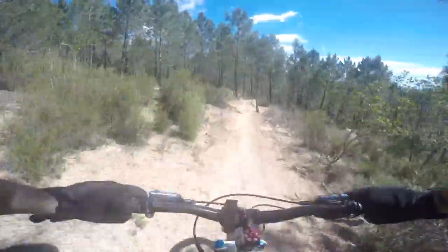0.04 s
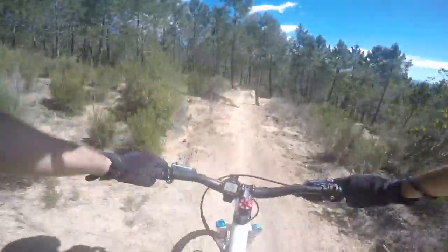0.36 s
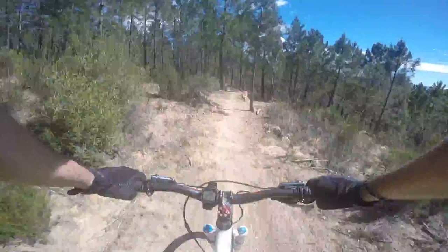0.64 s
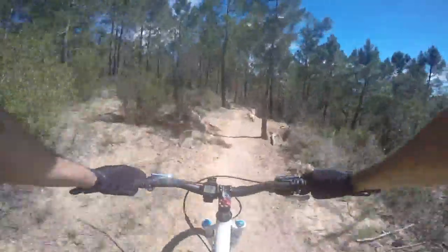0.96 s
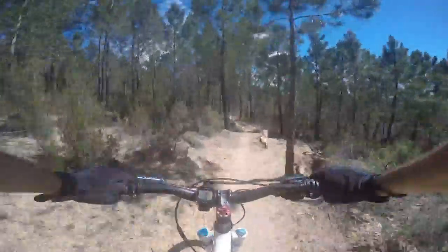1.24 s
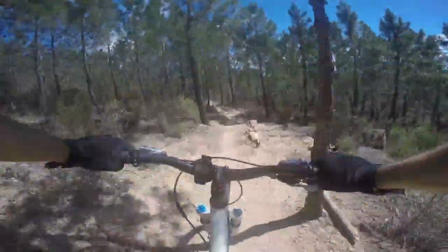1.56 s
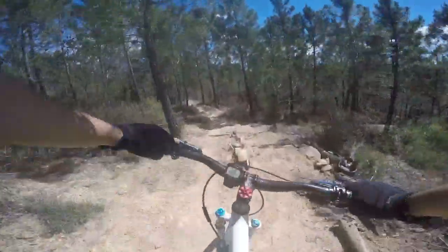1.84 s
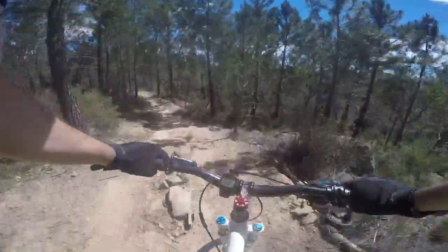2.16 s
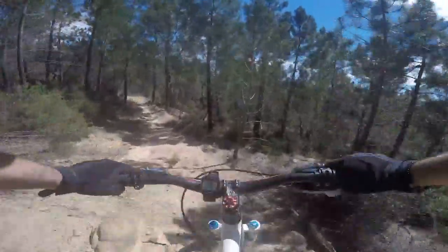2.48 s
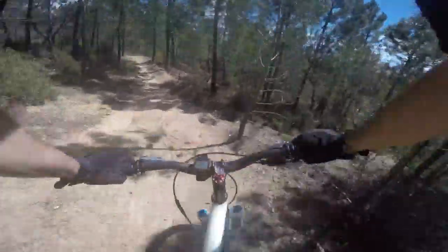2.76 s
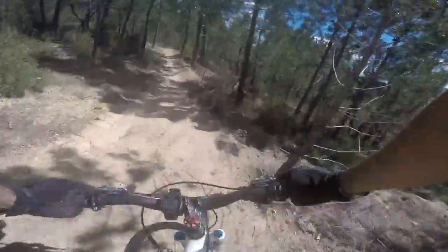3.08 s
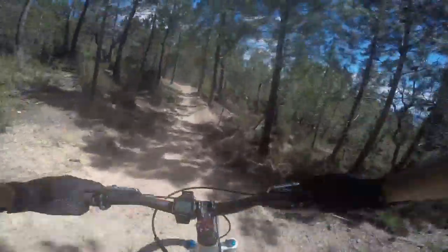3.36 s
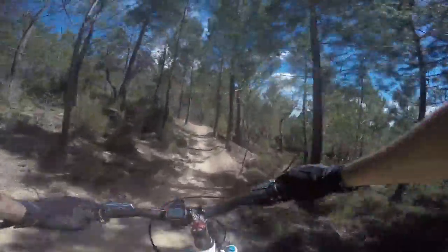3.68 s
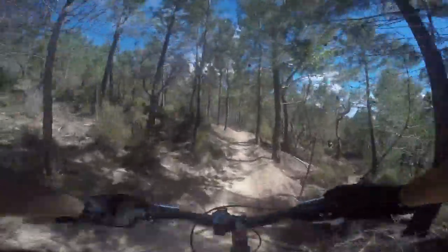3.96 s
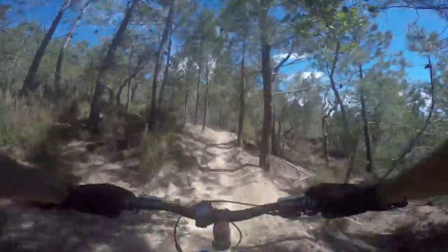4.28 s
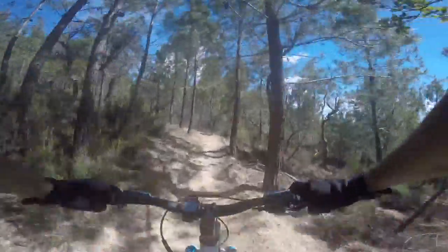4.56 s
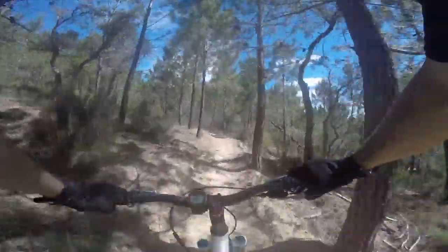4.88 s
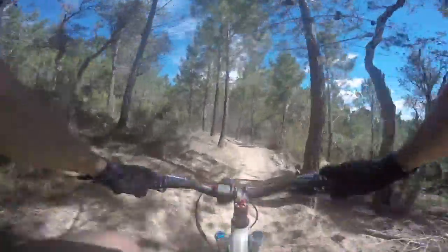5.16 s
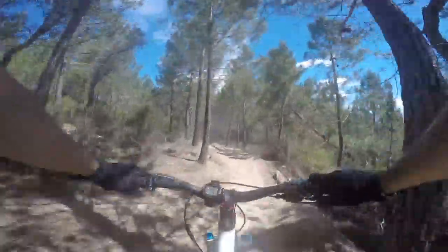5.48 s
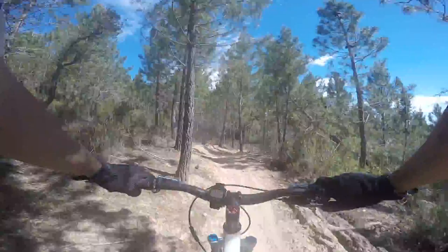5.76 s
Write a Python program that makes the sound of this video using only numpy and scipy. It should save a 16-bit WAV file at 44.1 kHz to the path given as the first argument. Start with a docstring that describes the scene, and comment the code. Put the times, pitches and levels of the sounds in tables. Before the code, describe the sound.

Gusty wind rumbles over the crunch of bicycle tyres on dirt and stones, with a buzzing freewheel, chain slaps and hollow bumps.

```python
"""A mountain bike runs down a dry forest trail, heard from a camera on the rider's chest.
From the start, wind buffets the microphone, the tyres crunch over grit and the freewheel sizzles.
The chain slaps early on, stones clack, and near 2 s one of them makes the wheel ring. Halfway, the tyres
skid through loose stones and bumps thump the hollow frame. Near 4 s the freewheel fades and the wind
picks up again; the chain slaps twice more, and the gears give their loudest clicks shortly before the end.
"""
import sys
import numpy as np
from scipy import signal
from scipy.fft import rfft, irfft
from scipy.io import wavfile
from scipy.ndimage import uniform_filter1d

SR = 44100
rng = np.random.default_rng(int(sys.argv[2]) if len(sys.argv) > 2 else 0)


def unload_wav(signal):
    """Save mono or channel-first audio to the path in sys.argv[1] as 16-bit WAV at rate SR, clipped to [-1, 1]."""
    wavfile.write(
        sys.argv[1],
        SR,
        np.round(np.clip(np.atleast_2d(signal).T, -1, 1) * 32767).astype(np.int16),
    )


N = 265923
T = np.arange(N) / SR

# Levels are relative: the functions add their own gains. A fade time is how long a 60 dB drop takes.
# air flowing over the microphone, weaker in slow, sheltered bends: (time [s], level [dB])
AIRFLOW = [(0, -21.5), (0.1, -12.5), (1.15, -10.5), (1.6, -13.5), (2.2, -13), (2.45, -20.5), (2.9, -22),
           (3.25, -23), (3.55, -30), (3.84, -22.5), (4.06, -14), (4.3, -14.5), (4.66, -27), (4.9, -23.5),
           (5.02, -13.0), (5.4, -16.5), (5.8, -17), (6.03, -27.5)]
# single gusts: (peak time [s], length [s], rumble level [dB], flutter level [dB])
GUSTS = [(0.273, 0.097, -9, -16.5), (0.58, 0.14, -27, -19.5), (1.026, 0.18, -31, -15),
         (1.18, 0.046, -13, -15), (1.312, 0.18, -34, -19.5), (1.49, 0.11, -12.5, -16),
         (1.706, 0.12, -12, -27), (2.073, 0.11, -10.5, -28), (2.222, .13, -26, -20.5),
         (2.6, 0.17, -16, -34), (2.771, 0.073, -13.5, -30), (3.242, .08, -21, -30.5),
         (3.712, 0.045, -18, -30), (4.153, 0.14, -19.5, -23), (4.358, 0.036, -34, -23),
         (4.807, 0.073, -16, -39), (5.004, 0.087, -15.5, -19), (5.268, 0.078, -24, -18.5),
         (5.36, 0.14, -12.5, -20), (5.562, .15, -19, -23)]
# short lulls in the airflow: (time [s], length [s], drop [dB])
LULLS = [(0.388, 0.056, 1), (0.71, .09, 3.5), (.9, 0.075, 9), (1.581, 0.076, 1.5), (2.47, 0.16, 4),
         (3.832, 0.098, 7.5), (5.1, 0.073, 5), (5.492, 0.041, 2)]
# deep rumble of big swirls of air: (frequency [Hz], level [dB])
RUMBLE_TONE = [(8, 1), (18, -6), (28, 2.5), (38, -5.5), (50, 2.5), (70, -6), (100, -8.5), (150, -29),
               (250, -28.5), (500, -93)]
# flutter of small swirls of air: (frequency [Hz], level [dB])
FLUTTER_TONE = [(50, -9), (90, 2), (130, 3), (180, -3), (260, -8), (350, -10.5), (470, -17), (600, -30.5),
                (900, -42), (2000, -75)]

# how hard the tyres work the dirt: (time [s], level [dB])
ROLLING = [(0, -38.5), (0.38, -39.5), (0.5, -36.5), (0.9, -36.5), (1.25, -33), (1.6, -39), (1.8, -32.5),
           (2.05, -41), (2.5, -41), (2.95, -37), (3.3, -42.5), (3.5, -43), (4.2, -45.5), (4.75, -44.5),
           (5.15, -43.5), (5.75, -45), (6.03, -44.5)]
# the tyres go light over a crest: (time [s], length [s], drop in their work [dB])
HOPS = [(0.385, 0.085, 3.5), (3.166, 0.12, 5.5), (4.558, 0.036, 9), (4.97, .12, 2.5)]
# patches of coarser grit: (peak time [s], length [s], level [dB])
GRIT_PATCHES = [(0.503, 0.13, -42), (1.116, .08, -39), (1.222, 0.17, -38), (3.063, 0.27, -41.5),
                (3.653, 0.17, -42)]
# grit being crushed: (frequency [Hz], level [dB])
GRIT_TONE = [(300, 1), (800, 2.5), (1080, 4.5), (1350, -5), (1650, -3.5), (2050, 3), (2350, 3), (2800, -2),
             (3500, -13), (5000, -42), (6000, -44), (12000, -65)]
# fine dirt thrown up: (frequency [Hz], level [dB])
SPRAY_TONE = [(1300, -11), (2200, -16.5), (2750, 0), (3200, 1.5), (3550, -0.5), (4200, 4.5), (4800, 3),
              (5300, -7.5), (5900, -14), (7000, -13), (12000, -72)]
# the frame droning on rough ground: (frequency [Hz], level [dB])
DRONE_TONE = [(100, -22), (190, -1), (235, -12), (262, 12), (295, -1), (400, 0.5), (485, 0), (550, -10.5),
              (850, -18.5), (1070, -15), (1300, -26), (2500, -67)]
# the tyres bite into loose stones and slide: (time [s], level [dB], fade time [s])
SKIDS = [(2.685, -22.5, .3), (2.715, -25, 0.5), (2.803, -31.5, 0.39), (2.868, -27, 0.13),
         (2.927, -30.5, 0.16), (3.205, -37, 1.1)]
# gravel grinding in a skid: (frequency [Hz], level [dB])
GRAVEL_TONE = [(120, -45), (200, 15), (280, 0.5), (480, 8), (750, 4), (1100, -2), (1330, -7.5),
               (1700, -2.5), (2900, -1), (3600, -4.5), (4300, -1), (5000, -3.5), (5700, -16), (9000, -50),
               (15000, -49)]

# bumps that thump the frame: (time [s], level [dB])
THUMPS = [(0.535, -12.5), (2.363, -19.5), (2.725, -15.5), (2.782, -11), (2.805, -14), (2.855, -0.5),
          (2.871, -4), (2.924, -11.5), (2.934, -13.5), (3.094, -20), (3.193, -13), (3.219, -19),
          (3.839, -22), (3.972, -15)]
# notes the frame rings with: (frequency [Hz], level [dB], fade time [s])
FRAME_NOTES = [(402.3, -3.5, 0.08), (479, 6, 0.018), (740, -8.5, 0.026), (850, -14, 0.11),
               (1240, -55, .035)]
# large stones knocked by the tyres: (time [s], level [dB], brightness [Hz], fade time [s])
STONES = [(0.0293, -23.5, 2390, 0.089), (0.6407, -23, 2520, 0.24), (0.8104, -20.5, 1760, 0.096),
          (0.930, -31, 2690, 0.043), (1.1378, -18, 1700, 0.033), (1.267, -22.5, 2500, 0.04),
          (1.409, -22, 3020, 0.025), (1.4502, -10, 4100, 0.016), (1.7773, -25, 4440, 0.12),
          (1.9694, -21.5, 2660, 0.048), (2.629, -21, 2370, 0.15), (2.6523, -24, 2650, 0.13),
          (2.6914, -15.5, 1920, 0.043), (2.7234, -20, 2880, 0.024), (2.805, -21, 1930, 0.045),
          (3.0012, -22.5, 1510, 0.1), (3.06, -24, 1400, 0.051), (3.1042, -18, 1610, 0.033),
          (3.1905, -12.5, 1910, 0.034), (3.1955, -15.5, 3980, 0.03), (3.268, -27, 4160, 0.14),
          (3.319, -24, 2080, 0.01), (3.9649, -24, 1830, 0.07), (4.416, -23.5, 1990, 0.014),
          (5.4137, -23.5, 2000, 0.055)]
# a dry clack: (frequency [Hz], level [dB])
CLACK_TONE = [(150, -15), (500, 12), (800, -4), (1130, 9), (1370, -10.5), (1650, 5), (2100, 8.5), (2400, 2),
              (2850, 8), (3550, 2.5), (4100, 8.5), (5100, -5.5), (6100, -13.5), (9000, -18.5), (15000, -39)]
# notes the wheel rings with: (frequency [Hz], level [dB], fade time [s])
WHEEL_NOTES = [(756, -7.5, 0.37), (1073, -10, .25), (1506, -12, .22), (1620, -3.5, .1), (2240, -2, .08),
               (2720, 7, 0.037)]
# the chain slaps the frame tube beside it: (time [s], level [dB], tilt towards treble [dB per octave])
SLAPS = [(0.4601, -15.5, -0.5), (4.6508, -21.5, -2), (4.8927, -18, -1)]
# notes that tube rings with: (frequency [Hz], level [dB], fade time [s])
TUBE_NOTES = [(407, 0.5, 0.023), (580, 0.5, 0.02), (1185, -4, 0.014), (1360, -12, 0.028),
              (1830, -5.5, 0.028), (2000, -3.5, .028), (2220, -9, 0.017), (3180, -8.5, 0.011),
              (3760, -8, .012), (3850, -7.5, 0.014), (4270, -9, 0.015), (5040, -6, 0.0088),
              (5490, -6, 0.011), (6400, -19, 0.0078)]
# clicks of the shifter and gears: (time [s], level [dB], fade time [s], top treble boost [dB])
GEAR_CLICKS = [(0.947, -25, 0.026, -17), (1.266, -25.5, 0.044, -7), (1.449, -29, 0.013, -20),
               (2.7695, -25, 0.026, -5), (3.019, -29.5, 0.021, 1), (3.201, -28, 0.024, -16),
               (4.015, -27, 0.04, -12), (5.2998, -17, 0.015, -5), (5.4263, -19, 0.015, -1),
               (5.5362, -23.5, 0.019, -1), (5.8356, -42, .014, -6)]
# one gear click: (frequency [Hz], level [dB])
GEAR_TONE = [(1000, -33), (2800, -4), (3700, 4), (4560, 10), (5400, 4), (6350, 0), (7100, -5), (7970, -2.5),
             (9400, -7), (12000, -8.5), (14300, -9), (16000, -7)]

# base loudness of the freewheel and the sand: (time [s], level [dB])
COASTING = [(0.0, -60), (1.29, -58), (2.06, -62), (2.6, -60.5), (3.7, -60.5), (4.03, -69.5), (4.4, -66.5),
            (6.03, -69.5)]
# the freewheel's sizzle: (frequency [Hz], level [dB])
SIZZLE_TONE = [(2000, -10.5), (3500, -5), (4300, 0.5), (5200, 6), (5900, -3), (6900, 0), (8200, -11),
               (10500, -9.5), (11800, -19), (13500, -10), (15300, -19), (16500, -28)]
# pace of the clear clicks of the pawls, the freewheel's little catches: (time [s], rate [clicks per s])
PAWL_RATE = [(0, 42), (.4, 90), (.6, 61), (.95, 66), (1.3, 48), (1.65, 44), (1.95, 39), (2.2, 41),
             (2.35, 40), (2.58, 40), (3.0, 57), (3.35, 76), (3.8, 87)]
# one pawl click: (frequency [Hz], level [dB])
PAWL_TONE = [(2000, -20), (4500, 18.5), (7000, -0.5), (10000, 5), (12000, -11), (14500, -1), (16500, -9)]

# the tyres' side knobs scrape hard dirt: (peak time [s], length [s], level [dB])
SCRAPES = [(0.665, 0.078, -44.5), (1.176, 0.19, -46), (4.197, 0.19, -45), (4.788, 0.038, -50),
           (5.13, 0.077, -43), (5.971, 0.098, -43.5)]
# the rasp of those knobs: (frequency [Hz], level [dB])
RASP_TONE = [(1200, -21), (2200, -5.5), (2900, 1.5), (3500, -1), (4500, -9.5), (6000, -21), (12000, -41)]
# soft, high swishes: (peak time [s], length [s], level [dB])
SWISHES = [(4.478, 0.26, -45.5), (4.602, .06, -46)]
# bright hiss shared by swishes, sand and the chain's snap: (frequency [Hz], level [dB])
HISS_TONE = [(2000, 6), (4500, 9), (7000, -1.5), (10000, -1.5), (12000, -9), (15000, -5), (16000, -15)]
# notes the camera's case rings with: (frequency [Hz], width [Hz], level [dB])
CASE_NOTES = [(1065, 64, -13), (1454, 420, -2), (2080, 50, -26), (2464, 55, -1.5), (2632, 73, -2),
              (3110, 130, -6.5), (3990, 95, -23)]

CRUNCH_GROWTH, SPRAY_GROWTH, DRONE_GROWTH = 0.59, 1.22, 0.37  # dB gained per dB of tyre work
FULL_FLOW_DB, FLUTTER_GROWTH = -13, 1.73  # a strong airflow; dB of flutter gained per dB of airflow


def wind():
    """Big swirls of air push on the microphone; small ones break off in puffs, more so in faster air."""
    flow_db = curve(AIRFLOW) - sum(drop_db * swell(s, length) for s, length, drop_db in LULLS)
    push = amp(flow_db - 1.5 + 1.57 * wander(hz=8.4))
    puffs = amp(-23.5 + FLUTTER_GROWTH * (flow_db - FULL_FLOW_DB) + 0.5 * wander(hz=6.5))
    for s, length, rumble_db, flutter_db in GUSTS:
        push = np.hypot(push, amp(rumble_db) * swell(s, length))  # hypot adds two sounds' powers
        puffs = np.hypot(puffs, amp(flutter_db) * swell(s, length))
    rumble = swirls(RUMBLE_TONE, hold_s=0.19)
    flutter = swirls(FLUTTER_TONE, hold_s=0.037) * unit(amp(3.14 * wander(hz=91)))
    return push * rumble + puffs * flutter


def tyres():
    """Rubber knobs crush grit in clumps and throw up fine dirt; rough ground makes the frame drone."""
    work_db = tyre_work_db() + wander(hz=7.6)
    grit = unit(colour(grains(per_s=3000, spread_db=2.5) * amp(2.8 * wander(hz=74)), GRIT_TONE))
    spray = unit(colour(grains(per_s=5000, spread_db=2.0) * amp(2.3 * wander(hz=69.4)), SPRAY_TONE))
    drone = unit(colour(rng.standard_normal(N), DRONE_TONE)) * amp(3.5 * wander(hz=30))
    patches = sum(amp(db) * swell(s, length) for s, length, db in GRIT_PATCHES)
    grit_gain = np.hypot(amp(-47 + CRUNCH_GROWTH * work_db), patches)
    spray_gain = amp(-43.5 + SPRAY_GROWTH * work_db)
    drone_gain = np.hypot(amp(-38.5 + DRONE_GROWTH * work_db), amp(-1.5) * skid_strength())
    return grit_gain * grit + spray_gain * spray + drone_gain * drone


def tyre_work_db(cruise_db=-38.5):
    """How much harder the tyres work than in ordinary rolling, which is cruise_db."""
    return curve(ROLLING) - cruise_db - hop_db()


def hop_db():
    """How far the tyres' work drops as a crest takes the weight off the bike."""
    return sum(drop_db * swell(s, length) for s, length, drop_db in HOPS)


def skids():
    """Coarse gravel grinds under the sliding tyres."""
    gravel = grains(per_s=4600, spread_db=4.5) * amp(1.2 * wander(hz=120))
    return skid_strength() * unit(colour(gravel, GRAVEL_TONE))


def skid_strength(bite_s=0.005):
    """How hard the tyres slide: each skid bites quickly and dies away."""
    slide = np.zeros(N)
    for s, db, fade_s in SKIDS:
        add(slide, s, np.minimum(T / bite_s, 1) * amp(db - 60 * T / fade_s))
    return slide


def frame():
    """Hard bumps ring the hollow frame, a little differently each time."""
    out = np.zeros(N)
    for s, db in THUMPS:
        add(out, s, amp(db - 9) * peaked(ring(FRAME_NOTES, detune=0.0092)))
    return out


def stones(wheel_hit_s=1.9725):
    """Loose stones clack against each other; one hits the wheel and makes it ring."""
    out = np.zeros(N)
    for s, db, brightness_hz, fade_s in STONES:
        tilt_db = 8.1 * np.log2(brightness_hz / 2700)
        clack = colour(burst(fade_s, rise_s=0.00087), CLACK_TONE, tilt_db)
        add(out, s, amp(db - 8) * peaked(clack))
    add(out, wheel_hit_s, amp(-34) * peaked(ring(WHEEL_NOTES)))
    return out


def chain(bounce_s=0.008):
    """The chain lands with a snap and a clack, rings the tube, then bounces twice, weaker and duller."""
    out = np.zeros(N)
    for s, db, tilt_db in SLAPS:
        snap = colour(burst(fade_s=0.017, rise_s=0.00057), HISS_TONE)
        clack = colour(burst(fade_s=0.013, rise_s=0.0011), CLACK_TONE, tilt_db=2)
        add(out, s - 0.0007, amp(db - 22) * peaked(snap))
        add(out, s, amp(db - 9) * peaked(clack))
        for bounce in range(3):
            tube = ring(TUBE_NOTES, tilt_db - 2.9 * bounce, detune=0.039)
            rattle = signal.fftconvolve(tube, burst(fade_s=0.011, rise_s=0.00036))[:len(tube)]
            add(out, s + bounce * bounce_s, amp(db - 5 * bounce) * peaked(tube + 0.15 * rattle))
    return out


def gears(settle_s=0.0064):
    """A small catch snaps, then taps once more as it settles into place."""
    out = np.zeros(N)
    for s, db, fade_s, treble_db in GEAR_CLICKS:
        tone = [(hz, level + treble_db * np.clip(np.log2(hz / 7000), 0, 1)) for hz, level in GEAR_TONE]
        snap = colour(burst(fade_s, rise_s=0.0003), tone)
        tap = colour(burst(fade_s=0.012, rise_s=0.00037), tone)
        add(out, s, amp(db - 3.5) * peaked(snap))
        add(out, s + settle_s, amp(db - 22) * peaked(tap))
    return out


def freewheel(teeth_per_s=270):
    """Little catches skip over a toothed ring in the hub, so fast that they blur into a sizzle."""
    level_db = curve(COASTING) + 9.5 - 1.4 * hop_db()
    teeth_passed = np.cumsum(teeth_per_s * (1 + 0.096 * wander(hz=3))) / SR
    ticks = (0.96 + np.exp(-(teeth_passed % 1) / 0.15)) * rng.standard_normal(N)
    return amp(level_db) * unit(colour(ticks * amp(2.8 * wander(hz=90)), SIZZLE_TONE))


def pawls(end_s=3.9, fade_s=0.018):
    """Until end_s, fine, bright clicks of the freewheel's catches stand out from the sizzle."""
    click_count = np.floor(np.cumsum(curve(PAWL_RATE)) / SR)
    starts = np.diff(click_count, prepend=0) * (T < end_s)
    pulses = signal.fftconvolve(starts, amp(-60 * T[:SR // 10] / fade_s))[:N]
    level_db = curve(COASTING) + 1.5 - 0.5 * hop_db()
    return amp(level_db) * unit(colour(pulses * rng.standard_normal(N), PAWL_TONE))


def scrapes():
    """The tyres' side knobs rasp briefly as the bike leans."""
    gain = sum(amp(db) * swell(s, length) for s, length, db in SCRAPES)
    dirt = grains(per_s=2500, spread_db=3.5) * amp(4.4 * wander(hz=90))
    return gain * unit(colour(dirt, RASP_TONE))


def pebbles():
    """Small stones clack at random under the tyres, louder as the tyres work harder."""
    hits = grains(per_s=10, spread_db=0.5)
    clacks = signal.fftconvolve(hits, burst(fade_s=0.018, rise_s=0.0013))[:N]
    return amp(-53 + CRUNCH_GROWTH * tyre_work_db()) * unit(colour(clacks, CLACK_TONE))


def swishes():
    """Short, smooth, high hisses come and go."""
    gain = sum(amp(db) * swell(s, length) ** 2 for s, length, db in SWISHES)
    return gain * unit(colour(rng.standard_normal(N), HISS_TONE))


def sand():
    """Single grains of sand tick against the bike as it coasts."""
    hits = grains(per_s=70, spread_db=2.5)
    patter = signal.fftconvolve(hits, burst(fade_s=0.02, rise_s=0.00084))[:N]
    return amp(curve(COASTING) - 4) * unit(colour(patter, HISS_TONE))


def camera_case(x):
    """Sound reaches the microphone through a small plastic case that rings at a few pitches."""
    return x + sum(amp(db) * signal.lfilter(*signal.iirpeak(hz, hz / width, SR), x)
                   for hz, width, db in CASE_NOTES)


def swirls(tone, hold_s):
    """Swirling air: noise whose strength stays even over spans longer than hold_s."""
    noise = colour(rng.standard_normal(N + SR), tone)[SR:]
    window = signal.windows.hann(int(hold_s * SR) + 3)
    power = np.abs(signal.fftconvolve(noise ** 2, window, "same"))
    return unit(noise / np.sqrt(power + 1e-12))


def grains(per_s, spread_db):
    """Tiny hits at random times, mostly small, a few larger."""
    size = amp(spread_db * np.minimum(rng.exponential(1, N), 4))
    return unit(size * rng.choice([-1, 1], N) * (rng.random(N) < per_s / SR))


def burst(fade_s, rise_s):
    """A short rattle of noise that rises quickly and dies away."""
    t = T[:SR // 6]
    return rng.choice([-1, 1], len(t)) * (1 - np.exp(-t / rise_s)) * amp(-60 * t / max(fade_s, 0.002))


def ring(notes, tilt_db=0, detune=0):
    """One blow on an object: its notes start together and each fades at its own pace."""
    t = T[:SR // 3]
    hz, db, fade_s = np.transpose(notes)[:, :, None]
    hz = hz * (1 + detune * rng.standard_normal(hz.shape))
    sign = (-1) ** np.arange(len(hz))[:, None]  # every other note starts by swinging the opposite way
    level_db = db + tilt_db * np.log2(hz / 2000) - 60 * t / fade_s
    waves = sign * amp(level_db) * np.sin(2 * np.pi * hz * t)
    return waves.sum(0) * (1 - np.exp(-t / 0.00019))


def colour(x, tone, tilt_db=0, size=8192):
    """Shapes a sound's bass and treble to a tone table; tilt_db per octave brightens or dulls it."""
    octave = np.log2(np.abs(np.fft.fftfreq(size, 1 / SR)) + 1)
    hz, db = np.transpose(tone)
    slope = np.clip(octave - np.log2(2500), -2, 1)
    log_gain = np.log(amp(np.interp(octave, np.log2(hz), db) + tilt_db * slope))
    response = np.exp(np.conj(signal.hilbert(log_gain)))  # rings only after a hit, never before
    taps = np.fft.ifft(response).real[:size // 2]
    return signal.fftconvolve(x, taps)[:len(x)]


def wander(hz):
    """A smooth random wobble of typical size 1, mostly slower than hz."""
    f = np.fft.rfftfreq(N, 1 / SR)
    return unit(irfft(rfft(rng.standard_normal(N)) / (1 + (f / hz) ** 2) ** 2, N))


def swell(s, length):
    """A smooth rise and fall of height 1 around time s."""
    return np.cos(np.pi * np.clip((T - s) / length, -0.5, 0.5))


def curve(rows):
    """Joins (time, value) points with straight lines, one value for each sample."""
    return np.interp(T, *np.transpose(rows))


def amp(db):
    """Turns decibels into a gain to multiply by."""
    return 10 ** (np.asarray(db) / 20)


def unit(x):
    """Scales a signal to an average power of 1."""
    return x / np.sqrt(np.mean(x ** 2) + 1e-20)


def peaked(x, size=88):
    """Scales a sound so that its loudest two milliseconds have a power of 1."""
    return x / np.sqrt(uniform_filter1d(x ** 2, size).max())


def add(mix, s, sound):
    """Mixes a sound in at time s."""
    part = mix[max(round(s * SR), 0):][:len(sound)]
    part += sound[:len(part)]


def scene():
    """All is close and outdoors; bumps and gravel keep the wheel ringing, knocks echo off the ground."""
    bumps = stones() + pebbles() + frame()
    rolling = tyres() + freewheel() + pawls() + sand() + skids() + scrapes() + swishes()
    knocks = bumps + chain()
    ground = burst(fade_s=0.06, rise_s=0.0045)
    wheel = ring(WHEEL_NOTES)
    echo = signal.fftconvolve(knocks, ground / np.linalg.norm(ground))[:N]
    ringing = signal.fftconvolve(bumps + rolling, wheel / np.linalg.norm(wheel))[:N]
    bike = rolling + knocks + gears() + amp(-11) * echo + amp(-27.5) * ringing
    return (wind() + camera_case(bike))[None]


def record(dry):
    """The camera drops the slowest pressure swings, rounds off big peaks and cuts the highest treble."""
    low_cut_hz, high_cut_hz, ceiling = 10, 15800, 0.8
    dry = signal.sosfilt(signal.butter(2, low_cut_hz, "high", fs=SR, output="sos"), dry)
    rounded = dry / (1 + (dry / ceiling) ** 6) ** (1 / 6)
    treble_cut = signal.firwin(255, high_cut_hz, window=("kaiser", 9), fs=SR)
    return signal.oaconvolve(rounded, treble_cut[None], "same")


dry = scene()
out = record(dry)
unload_wav(out)
```